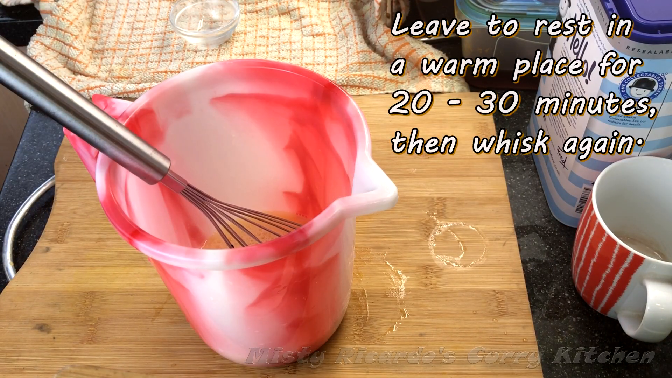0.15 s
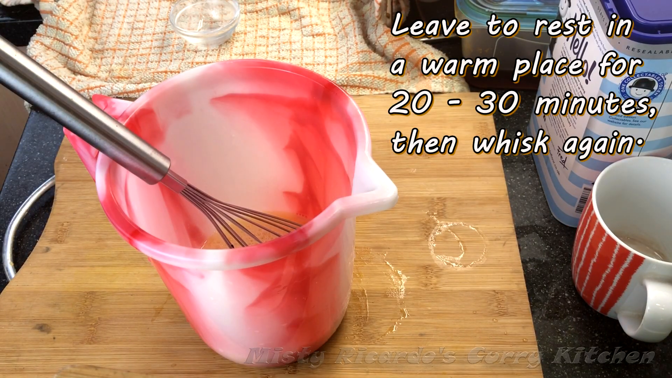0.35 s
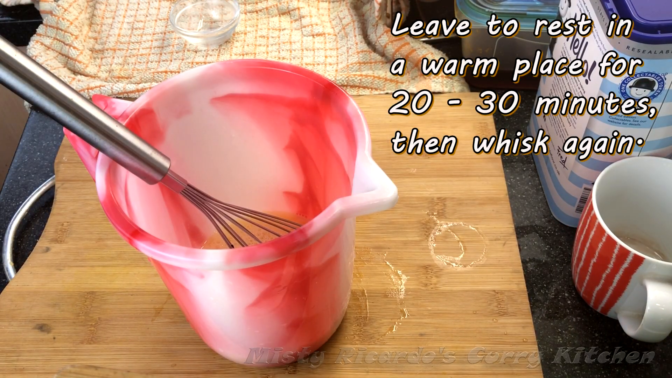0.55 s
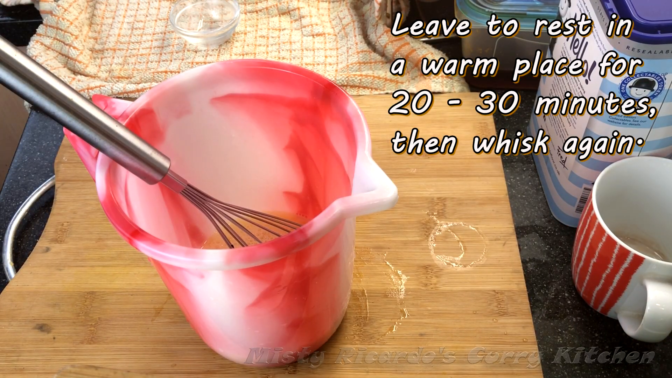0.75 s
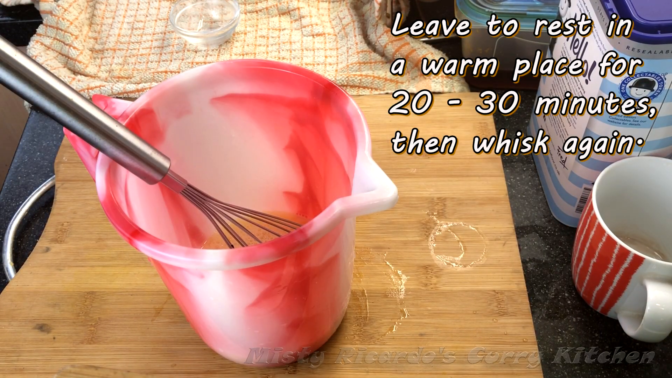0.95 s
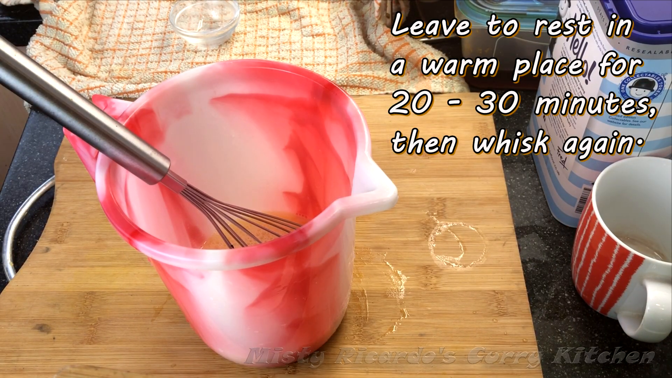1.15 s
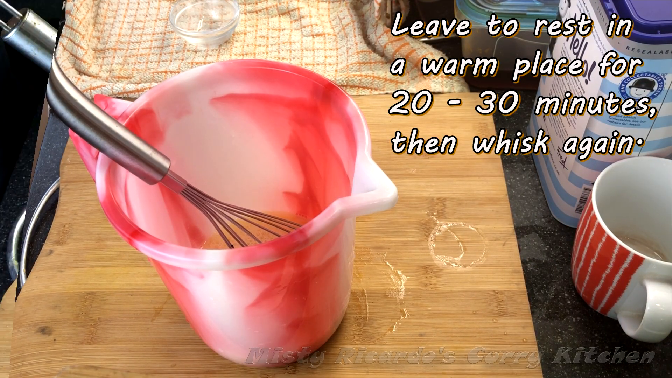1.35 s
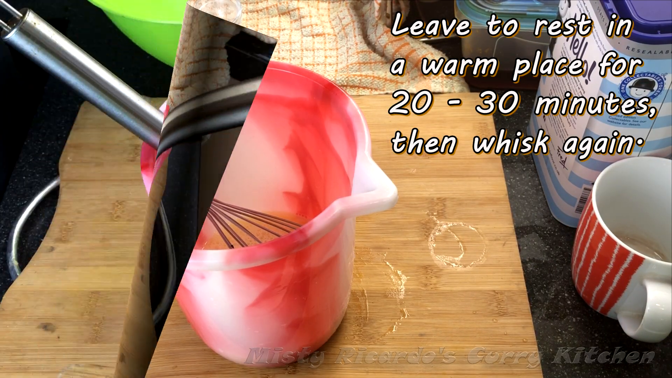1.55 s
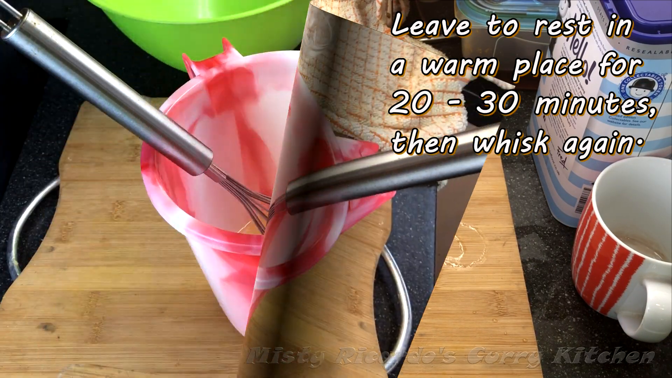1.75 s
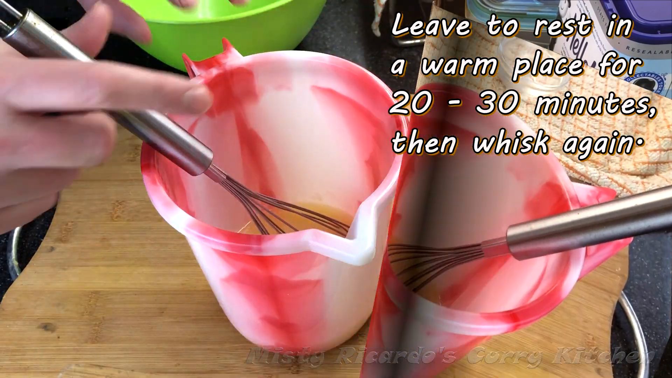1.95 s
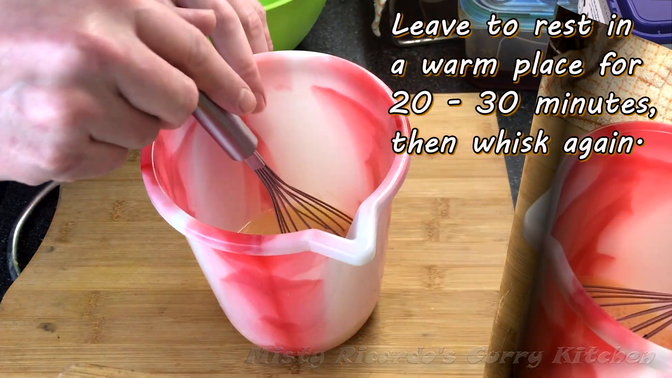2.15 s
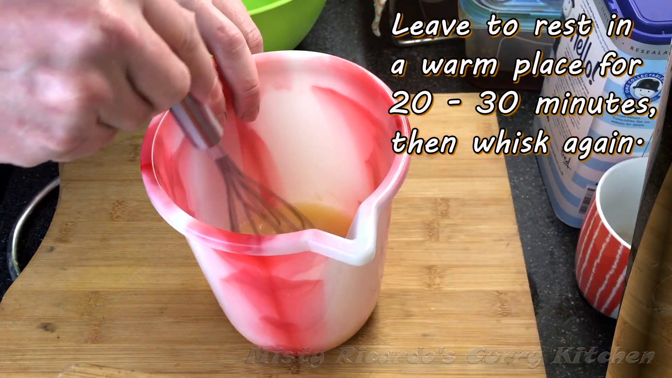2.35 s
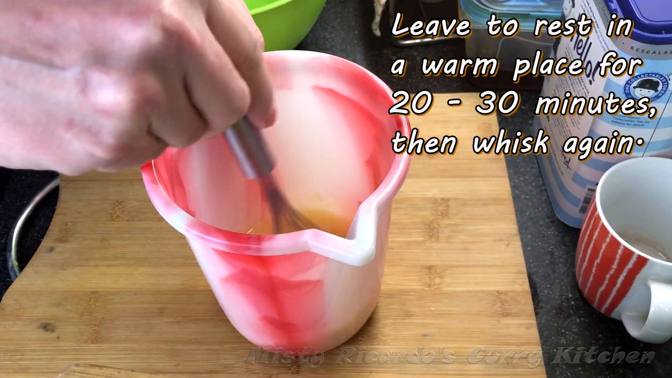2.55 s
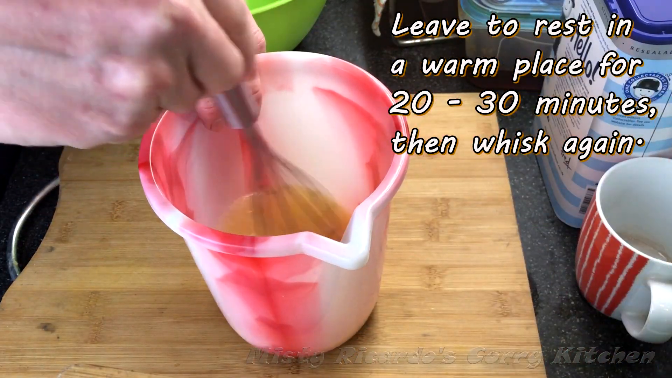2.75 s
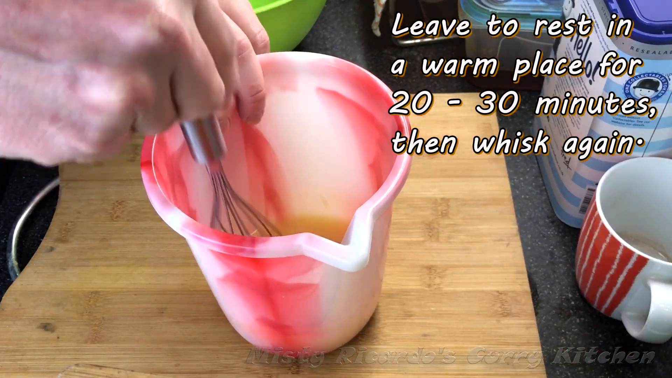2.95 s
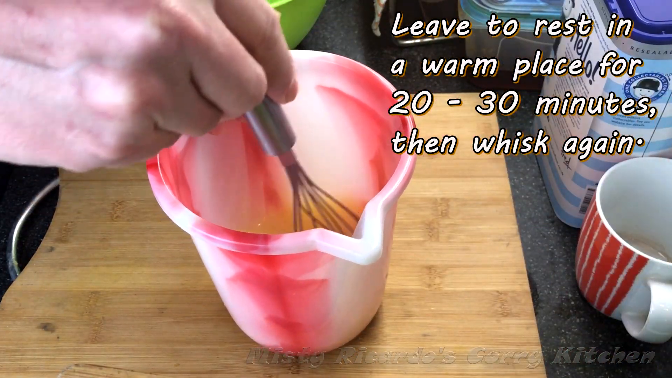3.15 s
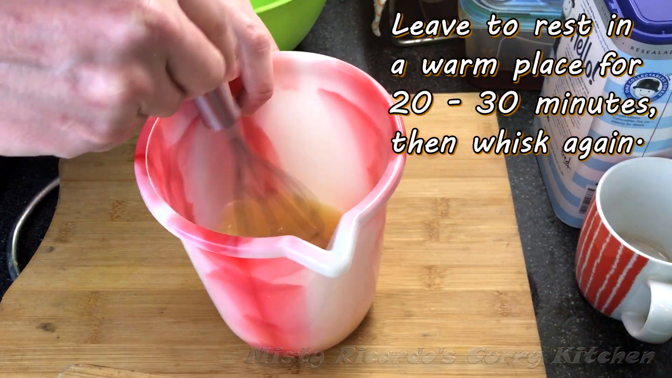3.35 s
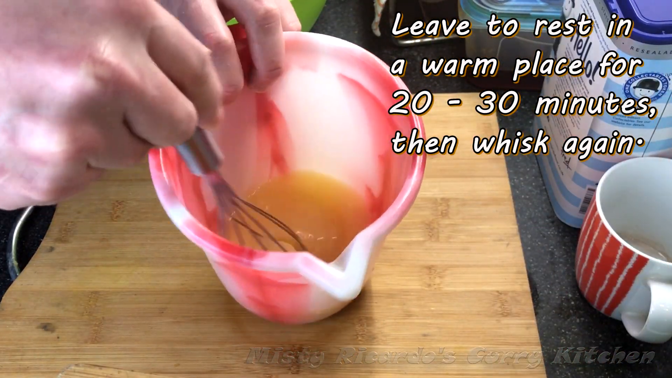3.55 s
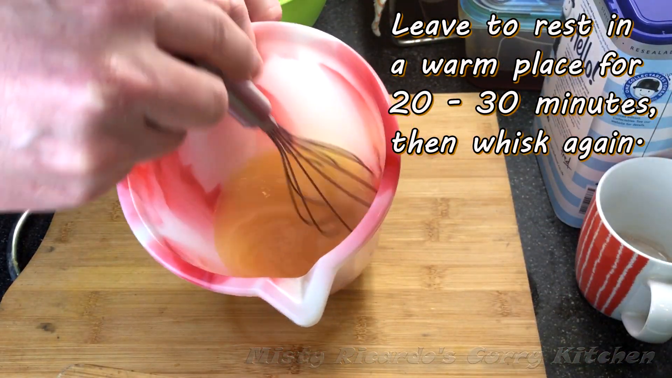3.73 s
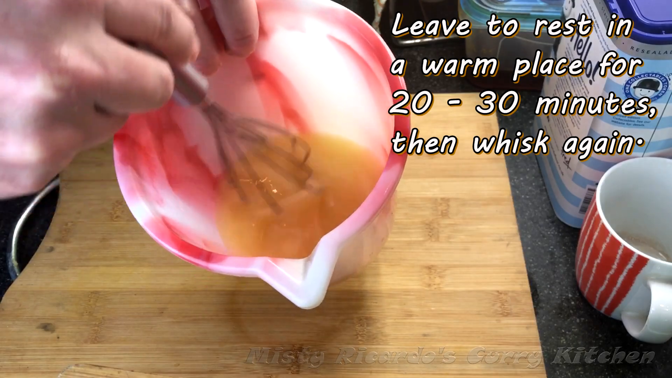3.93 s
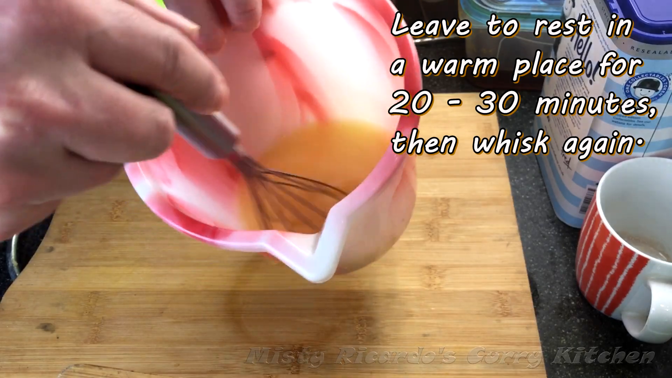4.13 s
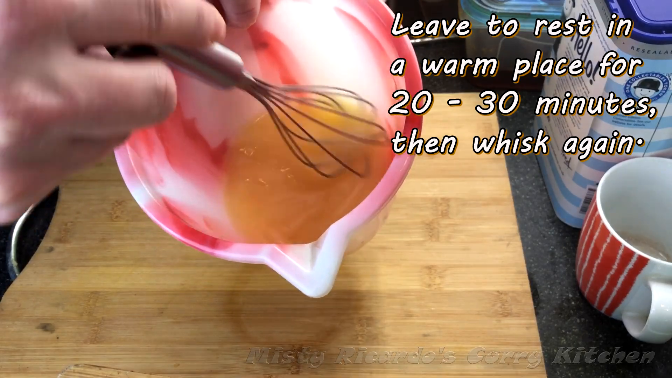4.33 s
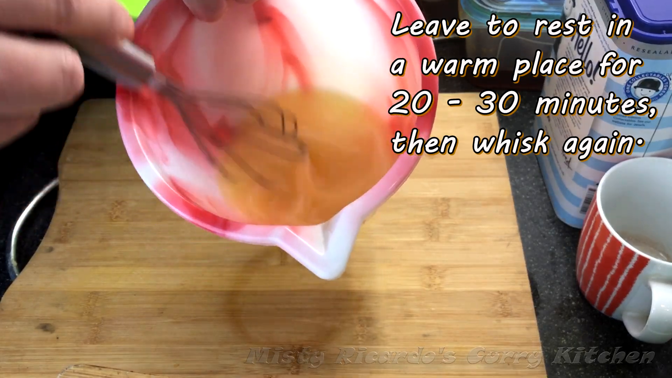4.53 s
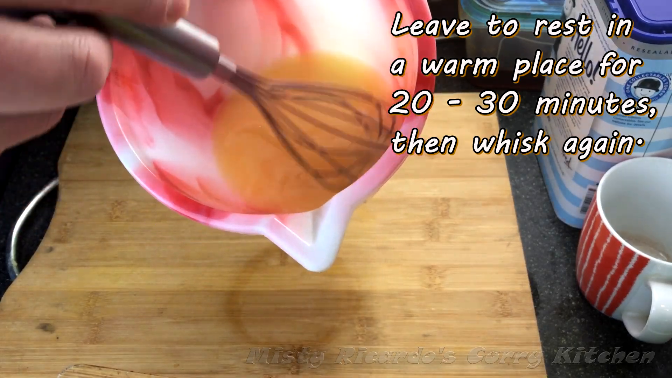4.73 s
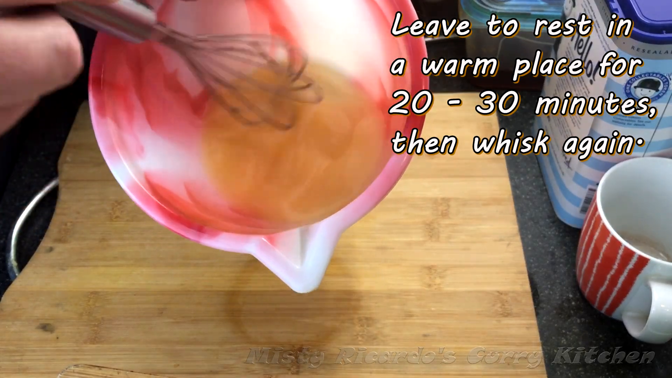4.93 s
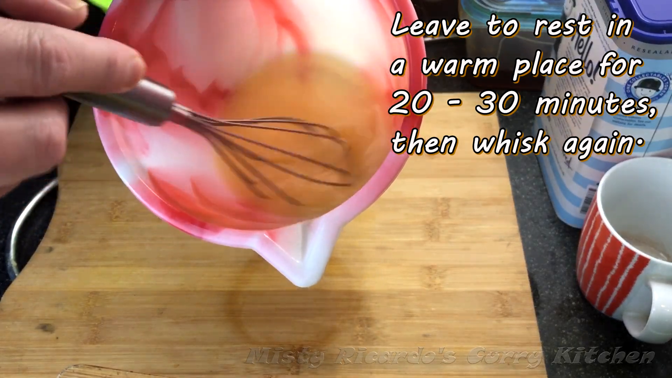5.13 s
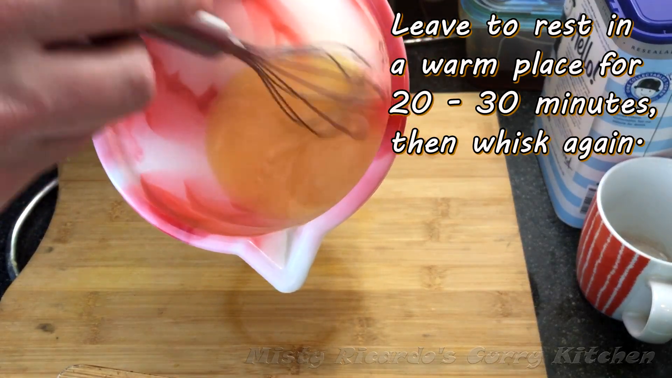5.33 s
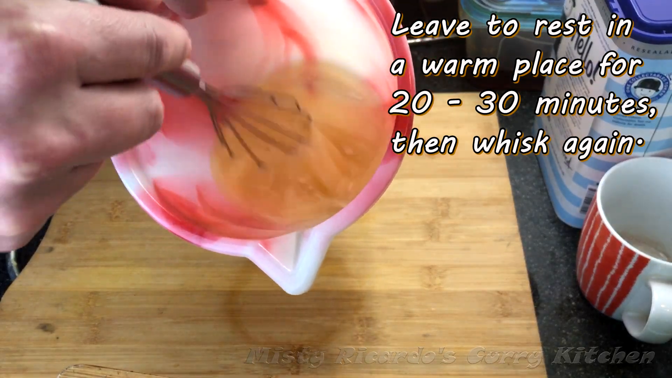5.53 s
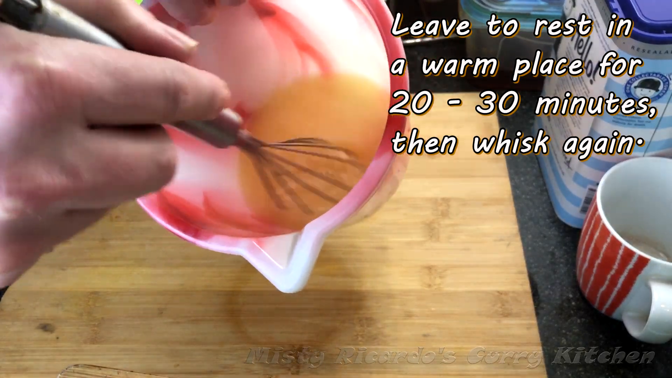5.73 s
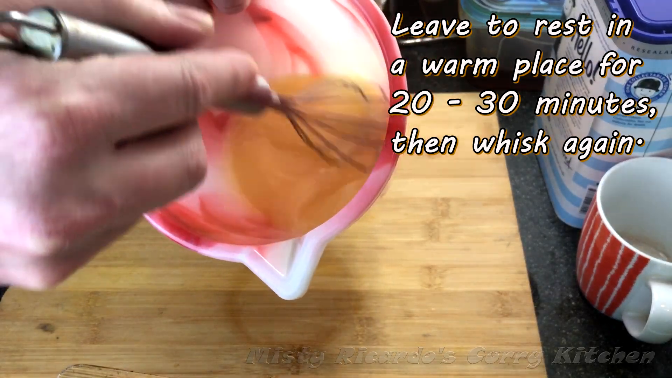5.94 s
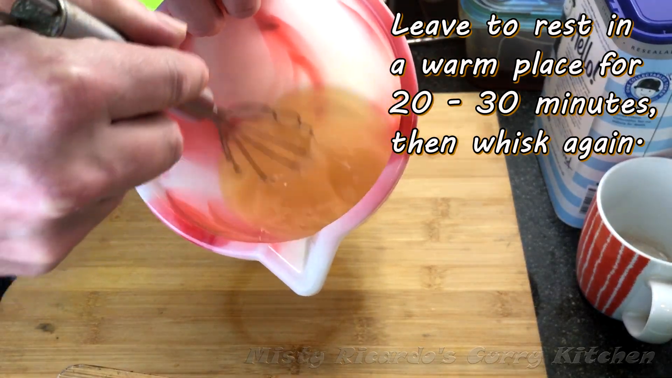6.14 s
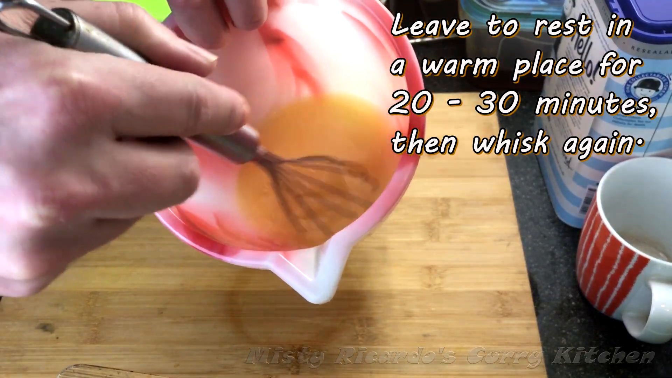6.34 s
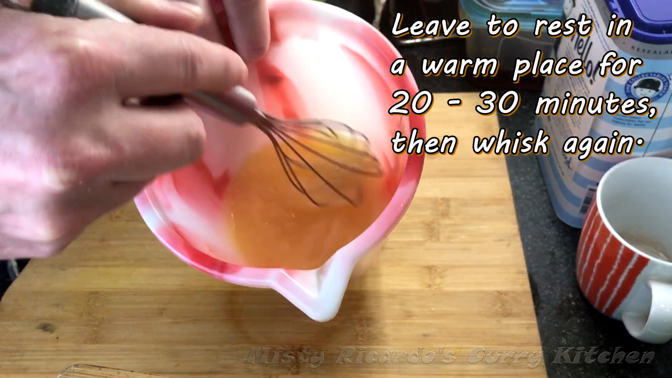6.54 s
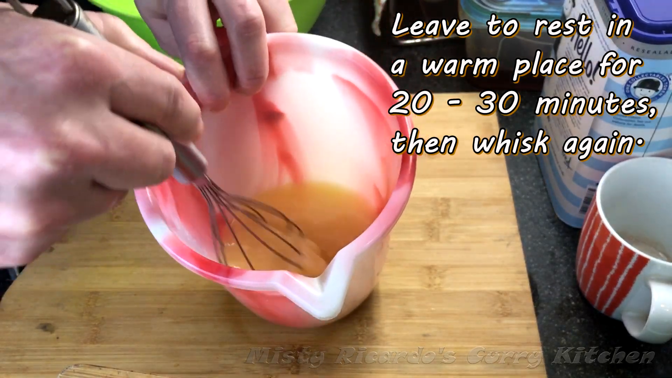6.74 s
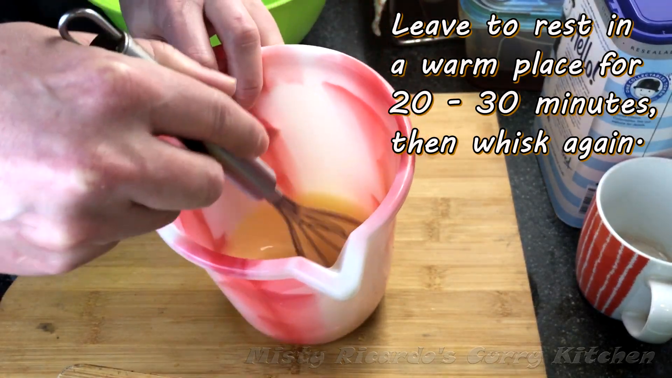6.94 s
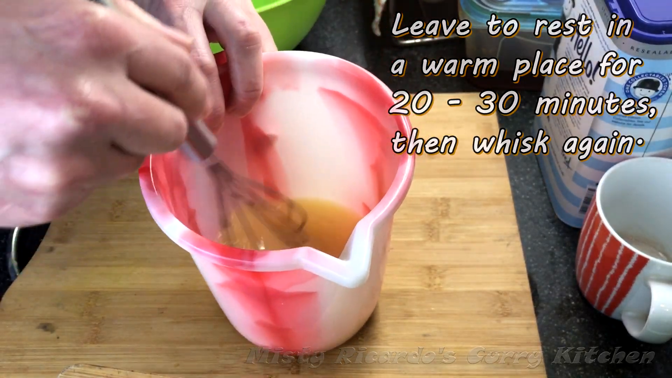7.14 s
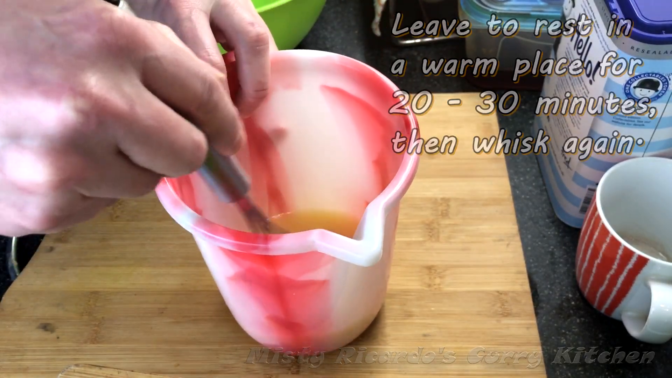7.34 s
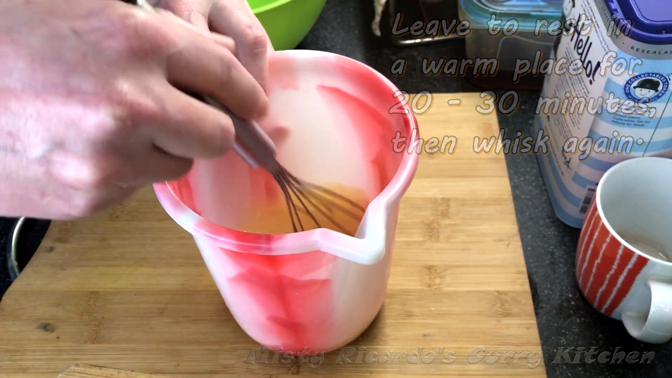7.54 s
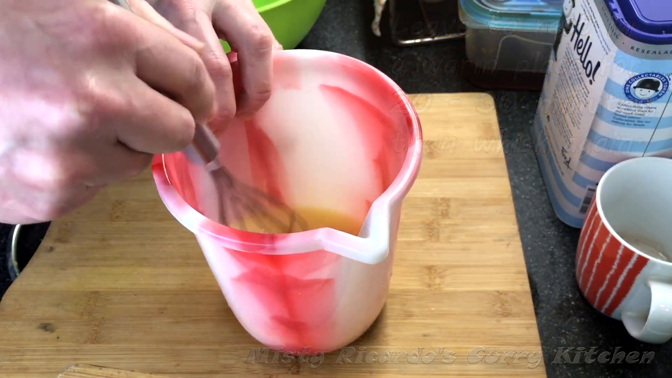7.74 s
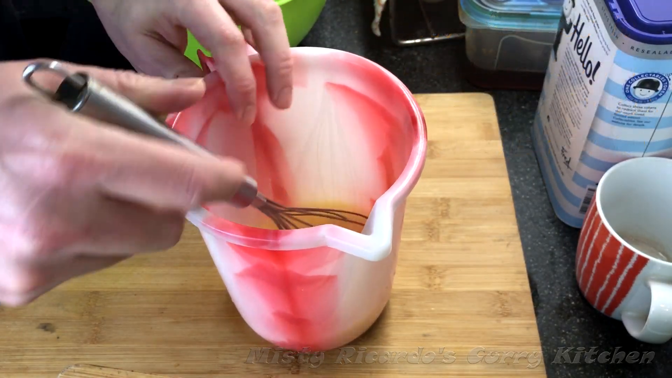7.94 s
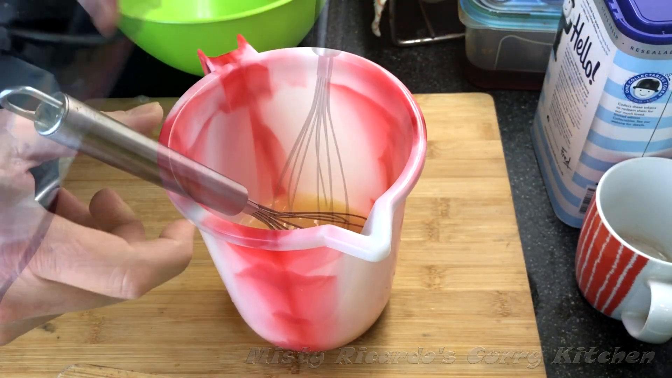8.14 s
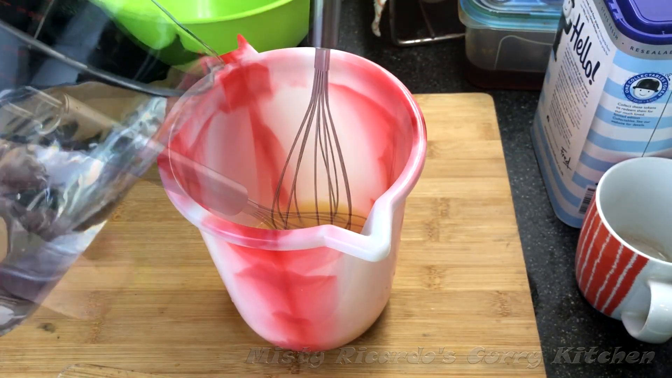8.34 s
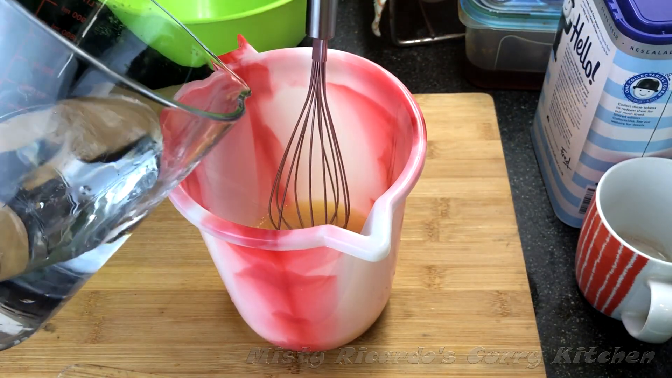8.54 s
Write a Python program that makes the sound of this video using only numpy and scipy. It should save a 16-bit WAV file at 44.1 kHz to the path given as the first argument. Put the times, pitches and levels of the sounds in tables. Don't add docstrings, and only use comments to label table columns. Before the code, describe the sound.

A quiet kitchen with a low fridge hum and faint cloth rustle. After about two seconds a wire whisk starts beating a little liquid in a plastic jug, slapping wall to wall about six times a second, with scrapes, brief squeaks and small gulps. It grows louder mid-way, then eases; the jug bumps the wooden board and the handle cracks on the rim. Close microphone, short room echo.

```python
import sys
import numpy as np
from scipy import signal
from scipy.fft import rfft, irfft
from scipy.io import wavfile
from scipy.ndimage import uniform_filter1d, map_coordinates

SR = 44100
rng = np.random.default_rng(int(sys.argv[2]) if len(sys.argv) > 2 else 0)


def waveform_to_disk(signal):
    frames = np.transpose(np.atleast_2d(signal))
    scaled = np.clip(frames, -1, 1) * 32767
    samples = np.round(scaled).astype(np.int16)
    wavfile.write(sys.argv[1], SR, samples)


def convert_level_to_amplitude(level_db):
    exponent = np.asarray(level_db, float) / 20
    return 10 ** exponent


N = 378378
SIZE = 4096
T = np.arange(SIZE) / SR
F = np.fft.rfftfreq(SIZE, 1 / SR)

# centre in Hz, width in Hz, level in dB.
WALL = [(1071, 28.5, 8.5), (1336, 41, 11), (2122, 166, 12.5), (2618, 53, 6.5), (2920, 304, 12),
        (3590, 1245, 6), (4250, 120, 11), (4630, 620, 0), (6540, 4300, -32.5)]
# centre in Hz, width in Hz, level in dB.
NOTE = [(1708, 80, 0), (1600, 120, -10), (2750, 90, -14)]
# centre in Hz, width in Hz, level in dB.
BODY = [(314.2, 5.86, 6), (469.7, 23.6, 2.5), (659, 16.3, -5), (739, 235, -9.5)]
# frequency in Hz, level in dB.
SNAP = [(600, -17.5), (1500, -13.5), (3500, 7), (6000, -1), (8500, -7.5), (12000, -14.5)]


def unit(x):
    return x / np.sqrt(np.mean(x ** 2) + 1e-20)


def along(points, hz):
    f, v = np.transpose(points)
    return np.interp(np.log(hz + 1), np.log(f + 1), v)


def wobble(rate):
    knots = rng.standard_normal(int(N * rate / SR) + 4)
    return map_coordinates(knots, [np.arange(N) * rate / SR])


def resonances(modes, hz):
    rows = []
    for k, (centre, width, db) in enumerate(modes):
        ring = 1j * hz * width / (centre * centre - hz * hz + 1j * hz * width)
        rows.append((-1) ** k * convert_level_to_amplitude(db) * ring)
    return np.array(rows)


def causal(gain):
    ceps = irfft(np.log(gain + 1e-6))
    ceps[..., 1:SIZE // 2] *= 2
    ceps[..., SIZE // 2 + 1:] = 0
    return np.exp(rfft(ceps))


def struck(force, response, peak_db):
    rows = irfft(rfft(force) * response, SIZE) * (1 - T / T[-1])
    return rows / np.abs(rows).max(axis=1, keepdims=True) * convert_level_to_amplitude(peak_db)[:, None]


def placed(times, rows):
    at = np.round(np.asarray(times) * SR).astype(int)[:, None] + np.arange(SIZE)
    return np.bincount(at.ravel(), rows.ravel(), N + SIZE)[:N]


def coloured(response):
    hz = np.fft.rfftfreq(N, 1 / SR)
    return unit(irfft(rfft(rng.standard_normal(N)) * response(hz), N))


def rattle(count, chatter_db, t60, spiky):
    ticks = rng.standard_normal((count, SIZE)) * np.exp(spiky * rng.standard_normal((count, SIZE)))
    force = convert_level_to_amplitude(chatter_db - 60 * T / t60) * ticks / np.exp(spiky ** 2)
    force[:, 0] += 1
    return force


def room_tone():
    # frequency in Hz, level in dB per Hz.
    air_curve = [(15, -79), (25, -27.5), (92, -18), (127, -12.5), (166, -8.5), (270, -21.5), (317, -25),
                 (489, -27.5), (624, -28), (695, -31), (1160, -25), (1650, -34), (16000, -53.5)]
    # centre in Hz, width in Hz, level in dB.
    fridge = [(95, 11, -80.5), (163.45, 14, -70), (313, 36, -85.5), (650, 8, -97), (950, 29, -92.5)]
    air = coloured(lambda hz: convert_level_to_amplitude(along(air_curve, hz)))
    hum = np.zeros(N)
    for centre, width, db in fridge:
        hum += convert_level_to_amplitude(db) * coloured(lambda hz: resonances([(centre, width, 0)], hz)[0] ** 2)
    return convert_level_to_amplitude(-77 + 6 + 0.89 * wobble(1)) * air + hum


def sleeve():
    # time in seconds, level in dB.
    swish = [(0, -77), (.15, -78), (.3, -93), (1.6, -105), (1.78, -84), (1.98, -79.5), (2.06, -100),
             (2.085, -79), (2.14, -91)]
    # centre in Hz, width in Hz, level in dB.
    cloth = [(2450, 300, -5), (3850, 220, 0), (5500, 260, -5), (2860, 5900, -13)]
    s = np.arange(N) / SR
    level_db = np.interp(s, *np.transpose(swish), right=-120)
    broad = coloured(lambda hz: np.abs(resonances([(1990, 2000, 0)], hz)[0]))
    ribbed = coloured(lambda hz: np.linalg.norm(resonances(cloth, hz), axis=0))
    return convert_level_to_amplitude(level_db) * np.where(s < 0.8, broad, ribbed)


def tipped(s):
    # time in seconds, tilt in dB per octave, mode pitch ratio, graze note in dB.
    attitude = [(2.3, -0.5, 1.01, 3), (3.1, -0.5, 1.01, -19), (3.9, -1, 0.97, 2), (4.4, 1.5, 1.065, 9),
                (4.65, 0.5, 1.205, -11), (5.3, 0, 1.12, 1.5), (5.7, -0.5, 1.046, -1.5),
                (6.6, 1.5, 0.94, -4), (7.3, -.5, 1.04, 3)]
    at, *columns = np.transpose(attitude)
    return [np.interp(s, at, column) for column in columns]


def contacts():
    # start in seconds, peak in dB, trailing wires' peak in dB, wall note in dB.
    near_slaps = [(2.3926, -42.5, -36, -49), (2.7324, -30, -30, -36), (3.0327, -36, -21, -39),
                  (3.3268, -30, -24.5, -44), (3.3813, -24, -32, -33.5), (3.6715, -24, -24.5, -60),
                  (3.9761, -22.5, -20, -33), (4.29, -25.5, -17.5, -36.5), (4.6001, -24.5, -27.5, -66),
                  (4.6145, -23.5, -27.5, -42), (4.64, -23.5, -26, -57), (4.9443, -22, -21.5, -43),
                  (4.9711, -22.5, -21, -63), (5.2788, -20, -22, -48.5), (5.3082, -25, -22.5, -52.5),
                  (5.6439, -14.5, -18, -55), (5.9347, -22, -32.5, -49.5), (6.2543, -13.5, -31, -41.5),
                  (6.5575, -16.5, -31, -41), (6.8536, -24, -20.5, -31), (7.197, -31, -28.5, -38.5),
                  (7.5219, -29.5, -27.5, -38.5), (7.8175, -28.5, -30, -42)]
    far_slaps = [(2.5021, -35, -33, -39.5), (2.8487, -30, -35, -37), (3.131, -27, -18, -28.5),
                 (3.458, -25, -28, -33.5), (3.762, -20, -20.5, -39), (4.0647, -24, -22.5, -36),
                 (4.3734, -23.5, -27.5, -45), (4.7165, -22.5, -35, -53), (5.049, -24.5, -29, -51),
                 (5.3755, -25, -16.5, -55.5), (5.6948, -23, -17, -37), (5.992, -16, -20.5, -34.5),
                 (6.3075, -19.5, -16, -31), (6.6144, -21.5, -19.5, -39), (6.943, -36, -24, -39),
                 (7.2849, -29.5, -31.5, -37.5), (7.6131, -28, -29, -35), (7.9008, -36, -29, -38.5)]
    near_lags_ms = [15, 28, 24, 7.5, 6, 10, 18, 24.5, 7, 11, 5.5, 15.5, 6.5, 6.5, 7.5, 7.5, 14, 10.5, 9.5,
                    12.5, 24, 19.5, 14.5]
    far_lags_ms = [7, 8.5, 6, 10.5, 8, 10, 12, 9, 17, 8, 6, 4, 5, 9.5, 8, 6, 8, 13]
    # start in seconds, peak in dB.
    grazes_upright = [(2.0726, -56.5), (2.11, -68), (2.1617, -63), (2.2724, -52), (2.302, -48.5),
                      (2.341, -45.5), (2.4292, -38.5), (2.4793, -34.5), (2.536, -49), (2.6346, -38),
                      (2.6543, -60), (2.6765, -34), (2.749, -23.5), (2.9492, -35), (2.9964, -35),
                      (3.012, -37), (3.0403, -27), (3.1788, -32), (3.3555, -28.5), (3.5132, -38.5),
                      (3.5722, -39.5), (3.6003, -35.5), (3.6462, -38), (3.717, -30.5), (3.754, -35),
                      (3.8093, -36), (3.8636, -32.5), (3.9013, -36)]
    grazes_tipped = [(3.966, -35), (4.0544, -44), (4.116, -39), (4.1457, -49), (4.166, -36.5),
                     (4.2174, -36), (4.296, -30), (4.3639, -46), (4.4926, -43), (4.5223, -41),
                     (4.591, -36.5), (4.7032, -28), (4.7985, -30.5), (4.8187, -32.5), (4.8951, -32.5),
                     (4.9195, -39), (5.027, -39), (5.0857, -38.5), (5.1156, -43), (5.1319, -37.5),
                     (5.1766, -32.5), (5.2214, -45), (5.357, -41), (5.4275, -31), (5.4696, -33),
                     (5.5771, -30)]
    grazes_lowered = [(5.739, -29.5), (5.8014, -42.5), (5.894, -41), (5.9142, -32.5), (6.0022, -20),
                      (5.9835, -40), (6.105, -49), (6.191, -44), (6.4135, -42), (6.5266, -36.5),
                      (6.5962, -44), (6.7164, -50), (6.74, -44.5), (6.794, -70), (7.067, -46),
                      (7.0896, -46), (7.1234, -50), (7.1369, -44), (7.17, -49), (7.3359, -48),
                      (7.4353, -49), (7.477, -50), (7.5064, -38), (7.6637, -39), (7.6787, -41),
                      (7.7537, -49)]
    straggler_db, skip_db = -12.5, -15.5

    rows = []
    for far, (table, lags_ms) in enumerate(((near_slaps, near_lags_ms), (far_slaps, far_lags_ms))):
        for (s, db, later_db, note_db), lag_ms in zip(table, lags_ms):
            trailing = s + lag_ms * 1e-3
            last = trailing + 0.01 * rng.uniform(0.65, 1.3)
            rows.append((s, db, note_db - 4, 0, far))
            rows.append((trailing, later_db, note_db, 1, far))
            rows.append((last, later_db + straggler_db, note_db - 2.5, 1, far))
    for s, db in grazes_upright + grazes_tipped + grazes_lowered:
        again = s + 0.011 * rng.uniform(0.6, 1.6)
        note_db = db - 10.5 + tipped(s)[2]
        rows.append((s, db, note_db, 0, 0))
        rows.append((again, db + skip_db, note_db + skip_db, 1, 0))
    return np.transpose(rows)


def wall(pitch, scatter_db, snap_db, bend=0.095):
    bent = pitch[:, None] * (1 + bend * rng.standard_normal((len(pitch), 1)))
    bent = pitch[:, None] ** 2 / bent
    modes = resonances(WALL, F / bent)
    strength = convert_level_to_amplitude(scatter_db * rng.standard_normal((len(pitch), len(WALL))))
    snap = convert_level_to_amplitude(snap_db)[:, None] * causal(convert_level_to_amplitude(along(SNAP, F)))
    return np.einsum("em,mef->ef", strength, modes) + snap


def slaps():
    # frequency in Hz, level in dB.
    sparkle = [(5000, -46), (7800, 4), (10500, 6), (13000, -6.5), (15500, 3.5)]
    # time in seconds, level in dB.
    belly = [(2.3, 1), (3.3, -4.5), (4.0, -7), (4.7, 3), (5.2, 3.5), (5.7, -1), (6.2, 3.5), (7.0, -2.5),
             (7.9, 6)]
    s, peak_db, note_db, late, far = contacts()
    count = len(s)
    tilt, pitch, _ = tipped(s)
    chance_db = 3 * rng.standard_normal((count, 2))

    glance_db = -0.28 * (peak_db[:, None] + 19.5)
    force = rattle(count, chatter_db=-15 + glance_db, t60=0.057, spiky=0.85)

    tilt = tilt + 0.072 * (peak_db + 23.5)
    octaves = np.log2(np.clip(F, 1000, 9000) / 1000)
    belly_db = np.interp(s, *np.transpose(belly))[:, None] / (1 + (F / 1500) ** 8)
    facing = causal(convert_level_to_amplitude(tilt[:, None] * octaves + belly_db))
    snap_db = 6.5 + 0.17 * (peak_db + 31)
    clatter = struck(force, facing * wall(pitch, scatter_db=4.0, snap_db=snap_db), peak_db)

    grip = convert_level_to_amplitude(3 * rng.standard_normal((count, len(NOTE))))
    bent = resonances(NOTE, F * (1 + 0.022 * rng.standard_normal((count, 1))))
    note = struck(force, np.einsum("em,mef->ef", grip, bent), note_db)

    sparkle_db = -49 + 1.35 * (peak_db + 30) + 12 * far + chance_db[:, 1]
    tick = struck(force * convert_level_to_amplitude(-60 * T / 0.0093), causal(convert_level_to_amplitude(along(sparkle, F))), sparkle_db)

    knock_db = -55 + 0.44 * (peak_db + 31) + 5 * late + chance_db[:, 0]
    jug = convert_level_to_amplitude(3.5 * rng.standard_normal((count, len(BODY)))) @ resonances(BODY, F)
    knock = struck(force, jug, knock_db)
    return placed(s, clatter + note + tick + knock)


def scrape():
    # time in seconds, level in dB.
    dragging = [(2.1, -81), (2.32, -55.5), (2.44, -62), (2.57, -52.5), (3.22, -61), (3.9, -52.5),
                (4.64, -62), (4.81, -56), (5.74, -65), (5.83, -60.5), (6.38, -59.5), (6.52, -70),
                (6.66, -57), (6.78, -69), (6.93, -74), (7.04, -61), (7.78, -56), (8.3, -76)]
    level_db = np.interp(np.arange(N) / SR, *np.transpose(dragging), left=-120, right=-120)
    uneven_db = 2.5 * (wobble(40) + wobble(400) + rng.standard_normal(N))
    slips = rng.standard_normal(N) * convert_level_to_amplitude(uneven_db)
    modes = np.vstack([resonances(WALL, F), convert_level_to_amplitude(11.5) * resonances(NOTE, F),
                       convert_level_to_amplitude(11.5) * resonances(BODY, F), [convert_level_to_amplitude(along(SNAP, F) - 9)]])
    body = irfft(causal(np.linalg.norm(modes, axis=0)))
    z = signal.stft(signal.fftconvolve(slips, body), nperseg=512)[2]
    patches = uniform_filter1d(rng.standard_normal(z.shape), size=7, axis=0)
    patches = uniform_filter1d(patches, size=6, axis=1)
    drifting = signal.istft(z * convert_level_to_amplitude(3 * unit(patches)), nperseg=512)[1][:N]
    return convert_level_to_amplitude(level_db - 6.5) * unit(drifting)


def drags():
    # start in seconds, length in seconds, level in dB, band start in Hz, band end in Hz.
    strokes = [
        (2.264, 0.21, -54.5, 3120, 3800),
        (2.559, 0.21, -57.5, 3070, 3140),
        (6.015, 0.12, -60.5, 3270, 3620),
        (7.103, 0.13, -53.5, 3080, 3330),
        (7.42, .1, -55, 3300, 3700),
        (7.63, 0.17, -54.5, 3200, 3250),
    ]
    slips_per_s, t60, pitch_spread = 1000, 0.0073, 0.15
    out = np.zeros(N)
    for s, length, db, from_hz, to_hz in strokes:
        count = int(np.clip(slips_per_s * length, 1, 200))
        where, pitch, size = rng.random((3, 200))[:, :count]
        scatter = np.exp(pitch_spread * 4 * (pitch - 0.5) * np.abs(2 * pitch - 1))
        hz = (from_hz + (to_hz - from_hz) * where) * scatter
        swell = np.interp(where, [0, 0.7, 1], [0.15, 1, 0.2]) * convert_level_to_amplitude(-14 * size)
        rings = np.sin(2 * np.pi * hz[:, None] * T) * convert_level_to_amplitude(-60 * T / t60)
        out += placed(s + length * where, convert_level_to_amplitude(db + 11) * swell[:, None] * rings)
    return out


def gulps():
    # start in seconds, peak in dB, pitch in Hz.
    pockets = [
        (2.76, -52, 410),
        (3.5, -46, 516),
        (3.535, -43, 600),
        (3.565, -38, 477),
        (5.58, -41.5, 398),
        (6.19, -61, 1200),
        (7.29, -46, 640),
        (7.67, -47.5, 378),
        (7.92, -29.5, 900),
    ]
    s, peak_db, hz = np.transpose(pockets)[:, :, None]
    phase = 2 * np.pi * hz * (T + 2 * T ** 2)
    decay = convert_level_to_amplitude(peak_db - 60 * T * hz / 20)
    attack = 1 - np.exp(-T / 0.004)
    return placed(s[:, 0], decay * attack * np.sin(phase))


def bumps():
    # start in seconds, peak in dB.
    landings = [
        (6.898, -31),
        (7.2, -46),
        (7.445, -48),
        (7.693, -46),
        (7.946, -47),
        (8.107, -44),
        (8.293, -75),
    ]
    # centre in Hz, width in Hz, level in dB.
    board = [(83, 54, -8.5), (147, 61, 2.5), (315, 5.7, 12), (516, 60, 9.5)]
    s, peak_db = np.transpose(landings)
    push_s = 0.00088 * convert_level_to_amplitude(-0.6 * (peak_db[:, None] + 35))
    push = T * np.exp(-T / push_s)
    wood = convert_level_to_amplitude(rng.standard_normal((len(s), len(board)))) @ resonances(board, F)
    return placed(s, struck(push, wood, peak_db - 5.0))


def drops():
    # start in seconds, peak in dB, ring in dB relative to the peak.
    falls = [
        (8.077, -23, -10),
        (8.4275, -50, -27),
        (8.5385, -57, -30.5),
    ]
    # centre in Hz, width in Hz, level in dB.
    rim = [(333, 65, -1), (503, 65, 3), (600, 52, 8.5), (1053, 98, -7), (1276, 80, -4), (2100, 440, -5),
           (3600, 220, -3)]
    s, peak_db, ring_db = np.transpose(falls)
    force = rattle(len(s), chatter_db=-18.0, t60=0.044, spiky=0.56)
    crack = struck(force, causal(convert_level_to_amplitude(along(SNAP, F))), peak_db - 6.0)
    ring = struck(force * convert_level_to_amplitude(-60 * T / 0.0051), resonances(rim, F).sum(axis=0), peak_db + ring_db + 11)
    return placed(s, crack + ring)


def kitchen(x):
    # frequency in Hz, t60 in seconds.
    decay = [(200, 0.46), (1500, 0.36), (5000, 0.22), (14000, 0.2)]
    out, step = np.zeros(N + SR), int(0.4 * SR)
    for start in range(0, N, step):
        hz, t, z = signal.stft(rng.standard_normal(SR // 2), SR, nperseg=256)
        fade = convert_level_to_amplitude(-60 * t / along(decay, hz)[:, None])
        tail = signal.istft(z * fade, SR, nperseg=256)[1]
        wet = signal.fftconvolve(x[start:start + step], tail / np.linalg.norm(tail))
        out[start + 200:][:len(wet)] += wet
    return out[:N]


def scene():
    whisking = sleeve() + slaps() + scrape() + drags() + gulps() + bumps()
    handle = drops()
    wet = convert_level_to_amplitude(-12.0) * kitchen(whisking + convert_level_to_amplitude(1) * handle)
    return (whisking + handle + wet + room_tone())[None]


def roll_off(x):
    return signal.sosfilt(signal.butter(12, 16990, fs=SR, output="sos"), x)


def record(dry):
    # frequency in Hz, gain in dB.
    mic = [(25, -12), (45, 0), (15700, 0), (16100, -20), (17000, -40)]
    hz = np.fft.rfftfreq(N, 1 / SR)
    heard = irfft(rfft(dry) * convert_level_to_amplitude(along(mic, hz)), N)
    return roll_off(heard)


dry = scene()
out = record(dry)
waveform_to_disk(out)
```